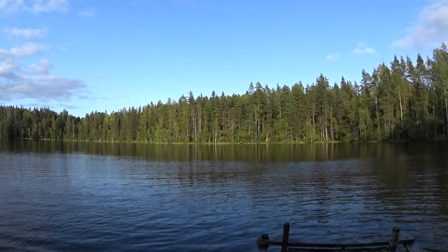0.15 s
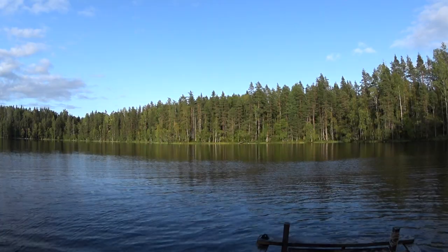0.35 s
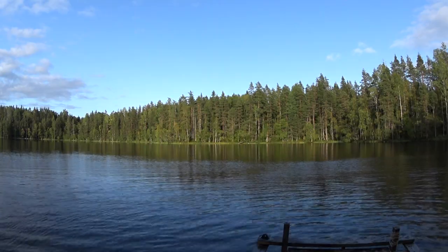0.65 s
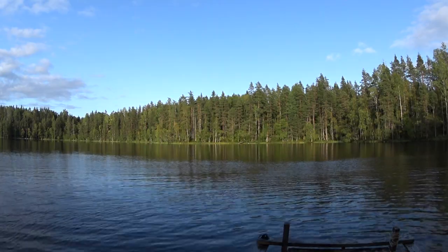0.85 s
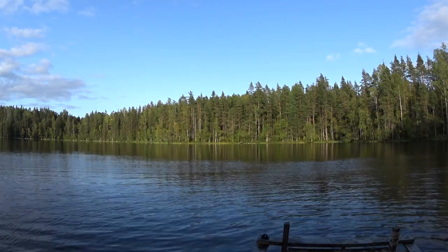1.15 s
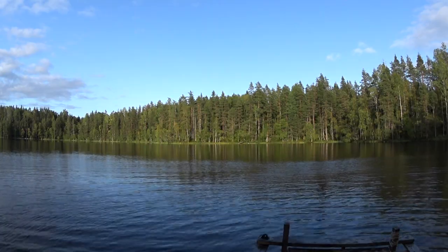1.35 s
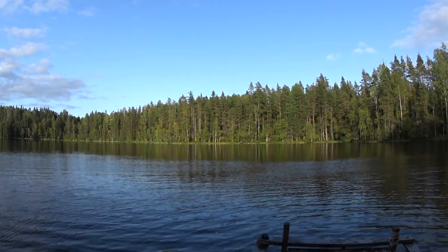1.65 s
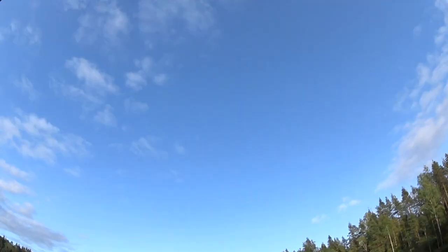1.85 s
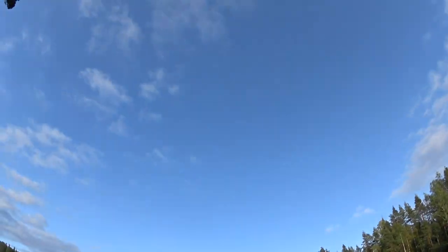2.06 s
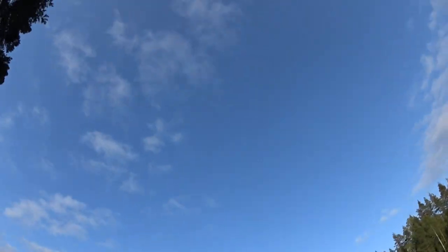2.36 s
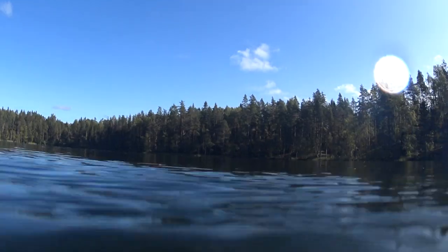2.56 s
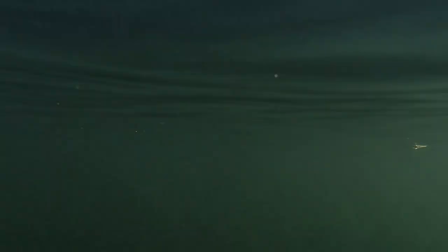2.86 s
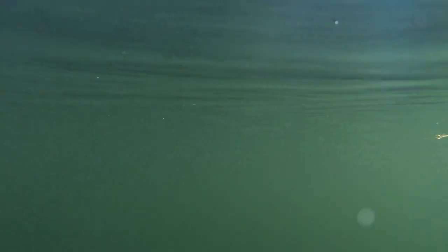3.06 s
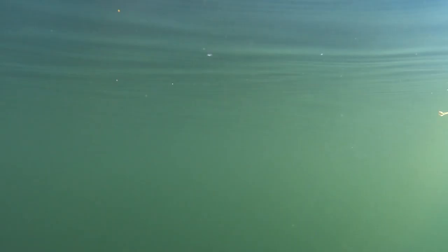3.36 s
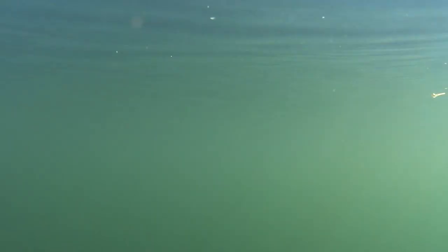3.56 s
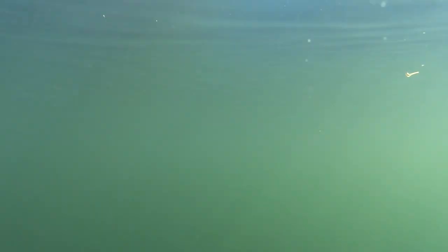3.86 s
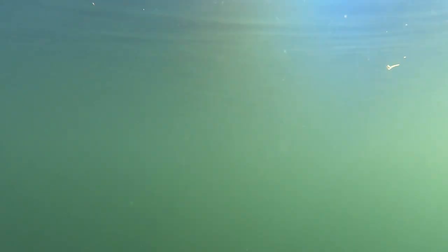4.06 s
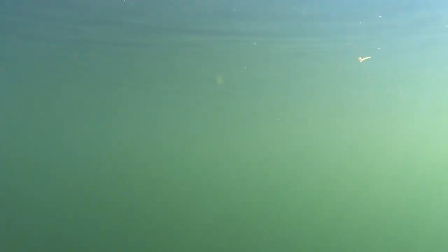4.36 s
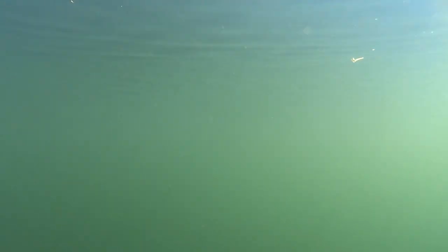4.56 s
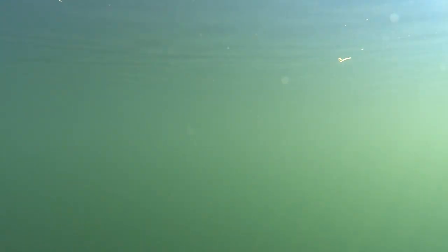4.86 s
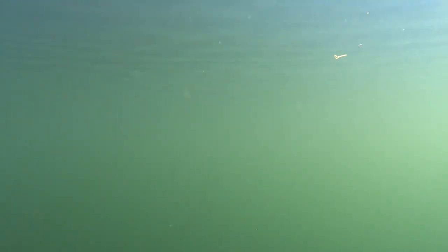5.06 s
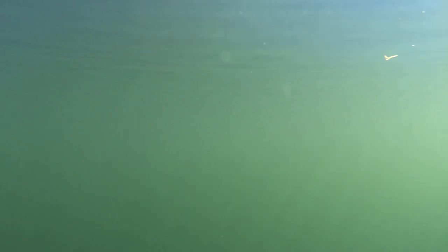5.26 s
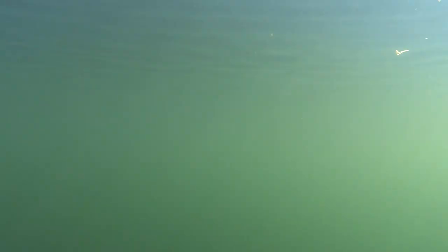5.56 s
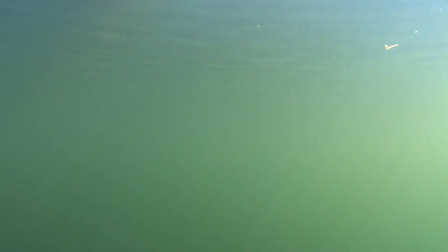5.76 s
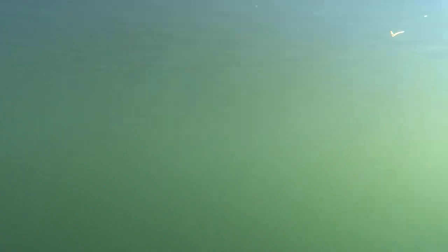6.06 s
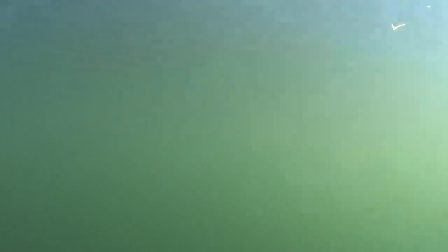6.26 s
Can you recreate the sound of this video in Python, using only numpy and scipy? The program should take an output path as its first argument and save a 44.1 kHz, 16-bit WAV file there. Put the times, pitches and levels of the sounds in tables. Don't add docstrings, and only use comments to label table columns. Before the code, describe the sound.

Uneven low wind and restless water splash around a camera housing outdoors, with a tiny loose fitting rattling. The wash suddenly becomes close and much louder, full of wet slaps and bright spray. Half way through the third second everything drops to a dull submerged hush. Small bubbles pop, trapped air snaps, then a hand strokes and bumps the shell, with one hard knock and a final grip.

```python
import sys
import numpy as np
from scipy import signal
from scipy.fft import rfft, irfft
from scipy.io import wavfile
from scipy.ndimage import uniform_filter1d

SR = 44100
rng = np.random.default_rng(int(sys.argv[2]) if len(sys.argv) > 2 else 0)


def int16_out(signal):
    q = np.round(np.clip(np.atleast_2d(signal).T, -1, 1) * 32767)
    wavfile.write(sys.argv[1], SR, q.astype(np.int16))


def undo_db(level):
    steps = np.asarray(level, float) / 20
    return 10 ** steps


N = 283254
SURFACE = int(2.5 * SR)
SHELL_EDGE_HZ = 1150


def level(x, db):
    return x * undo_db(db) / np.sqrt(np.mean(x ** 2))


def curve(*tables):
    s, *columns = np.vstack(tables).T
    return np.array([np.interp(np.arange(N) / SR, s, c) for c in columns])


def colour(points, hz):
    f, db = np.transpose(points)
    return np.interp(np.log(hz), np.log(f), db)


def band(x, hz, width):
    return signal.lfilter(*signal.iirpeak(min(hz, .44 * SR), hz / width, fs=SR), x)


def steep(x, hz, width):
    return band(band(x, hz, width), hz, width)


def between(x, low_hz, high_hz):
    edges = [low_hz, min(high_hz, .45 * SR)]
    return signal.sosfilt(signal.butter(3, edges, "bandpass", fs=SR, output="sos"), x)


def walk(rate, size=N):
    k = int(SR / rate)
    held = np.repeat(rng.standard_normal(size // k + 1), k)
    return 1.3 * uniform_filter1d(uniform_filter1d(held, k), k)[:size]


def grains(rate, scatter_db, size=N):
    chance, out = rng.random(size), np.zeros(size)
    hit = np.flatnonzero(chance < rate / SR)
    rank = chance[hit] * SR / rate
    out[hit] = (-1.) ** hit * undo_db(scatter_db * np.minimum(-np.log(rank + 1e-9), 4.0))
    return out


def crackle(t, scatter_db):
    size = -np.log(1 - rng.random(len(t) // 44 + 1))
    grain = np.repeat(undo_db(scatter_db * np.minimum(size, 3.5)), 44)[:len(t)]
    return rng.standard_normal(len(t)) * grain


def fade(t60, length=.3):
    t = np.arange(int(length * SR)) / SR
    return t, np.exp(-np.log(1000) * t / np.clip(t60, .004, 1))


def add(out, s, db, x):
    i = int(s * SR)
    x = x[:N - i]
    out[i:i + len(x)] += undo_db(db) * x / np.max(np.abs(x))


def lifts():
    # (time [s], gust level [dB])
    wind = [
        [(.02, -36), (.09, -32), (.32, -48), (.62, -54), (.82, -43), (.9, -53), (1.0, -41), (1.12, -48),
         (1.176, -34), (1.24, -48), (1.33, -30), (1.42, -38), (1.6, -43), (1.71, -56), (1.805, -49)],
        [(1.815, -40), (1.835, -27), (1.94, -42), (2.1, -38), (2.232, -30), (2.27, -33), (2.35, -25),
         (2.41, -35), (2.48, -35)],
    ]
    # (time [s], flow [dB], froth relative to flow [dB])
    lapping = [(.02, -38, -15), (.07, -45, -8), (.318, -58, -3), (.606, -49, -10), (.63, -38, -8),
               (.8, -44, -9), (.85, -33, -9), (.975, -35, -11), (1.14, -32, -4), (1.236, -35, -3),
               (1.29, -49, -2), (1.355, -38, 5), (1.43, -45, -7), (1.59, -45, -7), (1.61, -33, -4),
               (1.7, -46, -12), (1.77, -43, 5), (1.805, -45, -12)]
    # (time [s], flow [dB], froth relative to flow [dB])
    wash = [
        (1.815, -27, 3),
        (1.87, -32, 2),
        (1.933, -28, 4),
        (1.98, -32, -2),
        (2.09, -22, 1),
        (2.232, -22, -9),
        (2.28, -28, -6),
        (2.34, -21, 0),
        (2.48, -25, 2),
    ]
    gust, (flow, froth) = curve(*wind)[0], curve(lapping, wash)
    middling_flow_db, shore_db = -38, -61
    mist = -63 + 1.25 * (flow - middling_flow_db)
    return np.array([gust, flow, flow + froth, np.maximum(mist, shore_db)])[:, :SURFACE]


def rush():
    edges_hz = [30, 150, 800, 2500, 11000]
    # (frequency [Hz], density [dB per Hz])
    rush_colour = [(15, -43), (25, -10.5), (87, -7.5), (149, -2), (327, 2), (391, -0.5), (433, 1.5),
                   (1110, -9), (1550, -16.5), (4400, -31.5), (11000, -57), (14300, -82), (22000, -120)]
    centres = 28 * 2 ** np.arange(0, 8.7, 1 / 3)
    db = colour(rush_colour, centres) + 10 * np.log10(centres)
    group = np.clip(np.searchsorted(edges_hz, centres) - 1, 0, 3)
    totals = np.array([10 * np.log10(np.sum(undo_db(2 * db[group == g]))) for g in range(4)])
    lift = lifts() - totals[:, None]
    mids = np.log(np.sqrt(np.multiply(edges_hz[1:], edges_hz[:-1])))
    surge, gust = walk(60, size=SURFACE), walk(14, size=SURFACE)
    droplets = level(grains(1500, 3.3, size=SURFACE), 0)
    out = 0
    for hz, d in zip(centres, db):
        place = np.interp(np.log(hz), mids, np.arange(4))
        k = min(int(place), 2)
        here = lift[k] + (place - k) * (lift[k + 1] - lift[k])
        eddies = level(grains(1.5 * hz, 4.6, size=SURFACE), 0)
        eddies = eddies + 1.0 * droplets + 0.22 * rng.standard_normal(SURFACE)
        tone = level(steep(eddies, hz, .35 * hz), 0)
        flicker = 1.7 * surge * (hz > 150) + 0.28 * gust + 2.1 * walk(55, size=SURFACE)
        out = out + tone * undo_db(d + here + flicker)
    return np.pad(out, (0, N - SURFACE))


def slaps():
    # (time [s], peak [dB], centre [Hz], t60 [s])
    jetty_slaps = [(0.037, -40, 245, 0.08), (0.082, -39, 190, 0.08), (0.144, -35, 122, 0.052),
                   (0.173, -34.5, 170, 0.046), (0.289, -42.5, 261, 0.073), (0.39, -42, 520, 0.093),
                   (0.434, -37, 383, 0.062), (0.491, -39, 600, 0.08), (0.542, -36, 520, 0.11),
                   (0.631, -25.5, 317, 0.054), (0.722, -33, 750, 0.08), (0.769, -30.5, 487, 0.053),
                   (0.845, -28, 550, 0.08), (.895, -28, 500, .06), (0.925, -26, 450, 0.06),
                   (.94, -25, 450, .03), (1.02, -27, 700, .07), (1.11, -26, 500, .08),
                   (1.17, -28, 450, .08), (1.76, -29, 1300, .04), (0.992, -28, 579, 0.054),
                   (1.052, -24, 600, 0.1), (1.084, -24, 681, 0.037), (1.214, -21.5, 493, 0.17),
                   (1.344, -28, 1300, 0.09), (1.394, -26.5, 150, 0.03), (1.454, -30, 550, 0.08),
                   (1.526, -30, 215, 0.11), (1.602, -30, 600, 0.11), (1.645, -30.5, 326, 0.12),
                   (1.753, -27, 588, 0.08)]
    # (time [s], peak [dB], centre [Hz], t60 [s])
    close_slaps = [(1.813, -18, 662, 0.025), (1.819, -16, 220, .05), (1.834, -18, 200, 0.12),
                   (1.84, -18, 2000, .07), (1.859, -18, 600, .03), (1.89, -23, 600, .06),
                   (1.934, -18, 1900, .07), (2.158, -12, 600, .04), (2.35, -13, 700, .06),
                   (2.284, -17, 400, .06), (1.929, -18, 187, 0.098), (1.985, -16.5, 541, 0.056),
                   (2.067, -11, 600, 0.074), (2.123, -11, 420, 0.099), (2.144, -8, 500, 0.097),
                   (2.197, -16, 740, 0.051), (2.306, -15, 1300, 0.03), (2.329, -7.5, 371, 0.027),
                   (2.389, -14.5, 520, 0.08), (2.429, -14.5, 700, 0.068), (2.474, -17, 450, 0.05),
                   (2.44, -18, 900, .08)]
    out = np.zeros(N)
    for s, db, hz, t60 in [*jetty_slaps, *close_slaps]:
        t, decay = fade(t60)
        push = crackle(t, scatter_db=3.0) * decay * np.minimum(t / .002, 1)
        add(out, s, db - 0.5, steep(push, hz, 1.185 * hz) + 0.19 * between(push, 1.6 * hz, 4.1 * hz))
    return out


def thumps():
    # (time [s], peak [dB], frequency [Hz])
    port_thumps = [(.002, -14, 140), (0.087, -26.5, 157), (.176, -30, 166), (1.311, -34, 109),
                   (1.327, -19, 201), (1.394, -27, 174), (1.532, -30, 204), (1.8255, -19, 190),
                   (1.8295, -16, 180), (1.838, -14, 170), (1.8495, -12, 180), (1.8595, -14, 200),
                   (1.8795, -15, 700), (.148, -30, 250)]
    out = np.zeros(N)
    for s, db, hz in port_thumps:
        t = np.arange(int(3 * SR / hz)) / SR
        swing = np.sin(2 * np.pi * hz * t)
        add(out, s, db, swing * (hz * t) ** 0.78 * np.exp(-2.2 * hz * t))
    return out


def spray():
    # (time [s], peak [dB], bright part relative [dB])
    jetty_spray = [(0.1253, -42, -11), (0.1959, -41.5, -28), (0.5931, -46, -20), (0.6114, -37, 8),
                   (0.6252, -40, 5), (0.6544, -43, -19), (0.8091, -38, -32), (0.8759, -43, -12),
                   (0.8962, -34, -10), (0.9937, -31, -25), (1.0798, -37, -16), (1.1264, -39, -28),
                   (1.152, -39, -28), (1.212, -36, -35), (1.2544, -36.5, -10), (1.3414, -44, -27),
                   (1.3967, -25.5, 14), (1.4355, -40, 10), (1.492, -42, 16), (1.5216, -37.5, -15),
                   (1.5696, -37, -25), (1.6447, -29, -5), (1.7467, -38, -21.5)]
    # (time [s], peak [dB], bright part relative [dB], bright centre [Hz], t60 [s])
    hisses = [
        (.121, -44, 20, 6000, .09),
        (.613, -40, 18, 5800, .08),
        (.725, -40, -10, 4000, .05),
        (.828, -39, 3, 4000, .05),
        (.998, -41, 14, 5800, .08),
        (1.052, -24, 19, 6800, .028),
        (1.4, -30, 22, 6200, .07),
        (1.652, -40, 18, 7000, .12),
    ]
    # (time [s], peak [dB], bright part relative [dB],
    # bright centre [Hz], t60 [s])
    close_spray = [(1.8135, -12, 12, 8000, .016), (1.82, -28, 5, 7000, .05), (1.83, -30, 22, 9000, .05),
                   (1.834, -20, 18, 6500, .09), (1.842, -17, 18, 6500, .08), (1.848, -20, 22, 8500, .06),
                   (1.8555, -14, 18, 8000, .03), (1.864, -24, 16, 7500, .04), (1.876, -35, 16, 8500, .06),
                   (1.8861, -27, 14, 8000, .03), (1.9006, -38, 16, 8000, .02), (1.927, -27, -8, 4500, .05),
                   (1.9345, -22, 8, 3300, .06), (1.9884, -27, 10, 5500, .025), (2.0258, -27, 8, 7500, .015),
                   (2.033, -30, 8, 5000, .03), (2.043, -33, 10, 8000, .015), (2.0518, -20, 22, 7000, .012),
                   (2.0672, -26, 5, 5500, .04), (2.1221, -30, 10, 7500, .12), (2.155, -28, 10, 6000, .04),
                   (2.162, -29, 20, 5600, .014), (2.169, -26, 25, 8500, .01), (2.1995, -16, 9, 8500, .024),
                   (2.2034, -24, 22, 8500, .025), (2.215, -32, 15, 8500, .05), (2.27, -37, 20, 7000, .03),
                   (2.2962, -26, 22, 6300, .018), (2.3065, -30, 8, 5500, .012), (2.3261, -22, 8, 4500, .1),
                   (2.37, -26, 5, 4000, .1), (2.4, -26, 8, 4800, .05), (2.337, -22, 14, 6500, .025),
                   (2.3494, -21, 10, 6500, .012), (2.357, -29, 12, 6500, .03),
                   (2.3944, -26, 20, 7500, .016), (2.4144, -30, 20, 7000, .025),
                   (2.4778, -29, 22, 6000, .02)]
    bright_span = 1.26
    short = [(s, db, bright_db, 8200, .028) for s, db, bright_db in jetty_spray]
    out = np.zeros(N)
    for s, db, bright_db, hz, t60 in [*short, *hisses, *close_spray]:
        t, decay = fade(t60)
        push = crackle(t, scatter_db=3.5) * decay * np.minimum(t / (0.1 * t60), 1)
        body = band(between(push, 500, 5200), 2200, 3900)
        bright = between(push, hz / bright_span ** 2, hz * bright_span)
        add(out, s, db, body + undo_db(bright_db - 15.5) * bright)
    return out


def ringing_noise(hits, modes, t60):
    out = np.zeros(N)
    for s, db, low_db in hits:
        t, chatter = fade(t60)
        rings = []
        for hz, width, g in modes:
            ring = steep(chatter * rng.standard_normal(len(t)), hz, width)
            rings.append(undo_db(g) * ring * np.sqrt(300 / width))
        add(out, s, db, undo_db(low_db) * rings[0] + sum(rings[1:]))
    return out


def clinks():
    # (time [s], peak [dB], lowest mode [dB])
    taps = [
        (.122, -48, 2),
        (.15, -55, 6),
        (.615, -39, 1),
        (.645, -51, 5),
    ]
    # (frequency [Hz], width [Hz], level [dB])
    tap_modes = [
        (3176, 120, 1),
        (8750, 170, -2),
        (9250, 500, -11),
    ]
    return ringing_noise(taps, tap_modes, 0.088)


def top_bursts():
    # (time [s], peak [dB], lowest mode [dB])
    bursts = [
        (1.3978, -29.5, 0.1),
        (1.4376, -45, 0.1),
        (1.4935, -42.5, 0.1),
        (1.5247, -51, 0.1),
    ]
    # (frequency [Hz], width [Hz], level [dB])
    burst_modes = [
        (9600, 300, 0),
        (10200, 900, -2),
        (10900, 600, -4.5),
    ]
    thin_noise = ringing_noise(bursts, burst_modes, 0.11)
    edge_hz = 9380
    return between(between(thin_noise, edge_hz, 16000), edge_hz, 16000)


def knocks():
    # (frequency [Hz], level [dB], t60 [s])
    housing = [
        (408, 2.5, 0.052),
        (688, 4, 0.032),
        (835, -4, 0.035),
        (990, 4, 0.023),
    ]
    # (frequency [Hz], level [dB], t60 [s])
    latch_modes = [
        (1500, -27, .02),
        (1740, -18, 0.02),
        (1860, -21, .02),
    ]
    # (time [s], peak [dB], wall mode [Hz], middle modes [dB], upper modes [dB])
    free_knocks = [
        (4.001, -52, 300, -2, 8.5),
        (4.254, -48.5, 280, 1, 7.5),
        (4.549, -40, 258, 6.5, 7.5),
        (4.893, -44, 270, 6, 18),
        (5.5972, -21, 210, -0.5, 1),
        (5.668, -44, 250, 15, 19),
        (5.84, -44.5, 296, 10, 19),
        (6.197, -44, 301, 20, 10),
        (6.347, -48, 300, 3, 0),
        (6.395, -42.5, 300, 14, 8),
    ]
    # (time [s], peak [dB], wall mode [Hz], middle modes [dB], upper modes [dB])
    held_knocks = [
        (6.3136, -20, 254, 3.5, -12),
        (6.319, -18, 280, 8, -8),
        (6.3265, -26, 278, -7, -24),
        (6.3335, -30, 302, -9, -22),
    ]
    # (time [s], peak [dB], wall mode [Hz], middle modes [dB], upper modes [dB])
    squeezed_knocks = [
        (4.8148, -24, 270, -11, 0),
        (4.8335, -33, 250, -18, -26),
    ]
    grips = [(free_knocks, 1, 1), (held_knocks, .42, 1), (squeezed_knocks, .8, 1.1)]
    blows = [(*blow, rings, stiff) for blows_held, rings, stiff in grips for blow in blows_held]
    out = np.zeros(N)
    for s, db, wall_hz, middle_db, upper_db, rings, stiff in blows:
        t, scuff = fade(.04)
        ring_db = 20 * np.log10(rings)
        shares = [ring_db - 1.5, ring_db, middle_db, upper_db, upper_db]
        modes = [(wall_hz, 0, .055), (stiff * housing[0][0], *housing[0][1:]), *housing[1:]]
        ring = 0
        for (hz, g, t60), share in zip(modes, shares):
            tone = np.sin(2 * np.pi * hz * t) * fade(rings * t60)[1]
            ring = ring + undo_db(g + share) * tone * (1 - np.exp(-t * hz / 1.34))
        ring = ring + .45 * steep(scuff * rng.standard_normal(len(t)), 620, 670)
        latch = sum(undo_db(g) * np.sin(2 * np.pi * hz * t) * fade(t60)[1] for hz, g, t60 in latch_modes)
        latch = latch * undo_db((middle_db + upper_db) / 2) * np.minimum(t / .002, 1) ** 2
        shake = np.sin(2 * np.pi * 80 * t) * t * 75 * fade(0.1)[1]
        thump = 0.009 * undo_db(2 * min(middle_db, 4.0) + db + 20) * shake
        shell = between(between(ring + thump, 30, SHELL_EDGE_HZ), 30, 1.3 * SHELL_EDGE_HZ)
        add(out, s, db, latch - shell)
    return out


def bubbles():
    # (time [s], peak [dB], frequency [Hz], t60 [s], click share [dB])
    pops = [(2.501, -42, 850, 0.012, 14), (2.522, -47, 1830, .015, 4), (2.533, -31.5, 2000, 0.009, -3),
            (2.537, -38, 2050, .02, -30), (2.533, -34.5, 907, 0.013, -20), (2.582, -37, 1330, 0.022, -23),
            (2.737, -50, 1484, 0.01, 22), (2.908, -50.5, 1150, .015, 2.5), (3.105, -48, 1100, 0.01, 18),
            (3.139, -51.5, 420, 0.027, 9), (3.252, -54, 1700, 0.021, 9), (3.484, -42, 1794, 0.021, -15),
            (6.317, -50, 2500, 0.012, 0), (6.317, -56, 4300, .008, 6), (6.317, -54, 3400, .008, 6),
            (6.403, -66, 2350, .12, -20), (3.105, -58, 3100, .012, 0), (2.737, -58, 1950, .01, 5),
            (2.533, -40, 1400, .01, -20)]
    # (time [s], peak [dB], frequency [Hz], t60 [s], click share [dB])
    snap = [ (3.267, -30.5, 1096, 0.035, -14), (3.267, -19.5, 1636, 0.029, -25),
            (3.267, -33.5, 773, 0.057, -25), (3.274, -44, 5900, .008, 0), (3.278, -25.5, 2830, 0.022, -12),
            (3.278, -30, 4190, 0.012, -20), (3.278, -32, 2400, .02, -20), (3.278, -36, 1500, .02, -20),
            (3.278, -36, 750, .03, -20), (3.285, -62, 3270, .15, -30), (3.278, -30, 1074, 0.037, -3),
            (3.285, -62, 3090, 0.26, -30), (3.29, -56.5, 482, 0.63, -30), (3.29, -64, 647, .3, -30),
            (3.282, -47, 2700, 0.078, -30)]
    # (time [s], peak [dB], frequency [Hz], t60 [s], click share [dB])
    plinks = [(.198, -33, 1100, 0.008, 2), (.809, -37.5, 3850, .015, -5), (1.816, -11, 2420, 0.0082, 0),
              (1.8165, -11, 800, .011, -10), (1.857, -15, 7500, .008, -5), (1.921, -32, 8000, .009, -20),
              (1.921, -28, 3900, .01, -10), (2.068, -26, 4900, .01, -5), (2.175, -30, 4500, .03, -20),
              (2.203, -18, 2500, .015, -6), (2.231, -33, 7500, .01, -20), (.622, -38, 3150, .03, -10),
              (.65, -42, 3150, .03, -20), (.897, -39, 2500, .012, 0), (1.385, -38, 3300, .015, -10),
              (2.199, -15.5, 2590, .025, -6), (2.204, -19, 6390, .012, -15), (2.211, -26, 6300, .012, -15),
              (2.307, -11, 2200, 0.014, -15), (2.308, -16, 1600, .018, -22), (2.316, -25, 3400, .01, -20),
              (2.32, -22, 2100, .015, -20), (2.478, -27, 5300, 0.013, -15)]
    out = np.zeros(N)
    for s, db, hz, t60, click_db in [*pops, *snap, *plinks]:
        t, decay = fade(t60)
        rise = 1 + 0.011 * t / max(t60, .03)
        tone = np.sin(2 * np.pi * hz * t * rise) * decay * np.minimum(t / 0.00071, 1)
        wobble = 0.97 * band(rng.standard_normal(len(t)) * decay ** .6, hz, 0.16 * hz)
        click = steep(rng.standard_normal(len(t)) * fade(0.0088)[1], min(2.1 * hz, 5000), 3600)
        add(out, s, db, tone + wobble + undo_db(click_db - 7.0) * click)
    return out


def pressure(hz):
    # (time [s], length [s], level [dB], favoured pitch [Hz])
    strokes = [(2.79, .12, -68, 950), (2.98, .05, -64, 620), (3.3, .05, -59, 880), (3.29, .1, -73, 240),
               (3.35, .07, -66, 750), (4.45, .1, -65, 1000), (4.59, .1, -60, 650), (4.7, .06, -65, 520),
               (4.78, .1, -59, 700), (4.9, .06, -63, 750), (5.0, .03, -63, 750), (5.09, .06, -62, 800),
               (5.22, .16, -64, 700), (5.46, .07, -66, 900), (5.62, .1, -62, 520), (5.78, .1, -57, 880),
               (5.8, .08, -71, 230), (6.01, .1, -56, 680), (6.16, .14, -57, 760), (6.33, .04, -52, 480)]
    grip_s, let_go_s, press_db = .04, .07, -2.5
    focus_db = 7.5
    t = np.arange(0, N / SR + .002, .002)

    def share(db, favoured):
        return undo_db(db - focus_db * np.log2(hz / favoured) ** 2)

    drive = share(-80, 900)
    for s, length, db, favoured in strokes:
        corners = s + np.cumsum([-grip_s, grip_s, length, let_go_s])
        drive = drive + share(db + press_db, favoured) * np.interp(t, corners, [0, 1, 1, 0]) ** 2
    return np.interp(np.arange(N) / SR, t, drive)


def rubbing():
    # (frequency [Hz], width [Hz])
    rub_modes = [
        (230, 79),
        (400, 170),
        (700, 150),
        (1030, 180),
    ]
    # (frequency [Hz], width [Hz], level [dB])
    loose_panels = [
        (545, 90, -6),
        (850, 100, -2),
    ]
    panel_held_s = 5.7
    slips = level(grains(600, 2.3), 0) + 1.05 * rng.standard_normal(N)
    creak = 2.2 * walk(45)

    def mode(hz, width):
        tone = level(steep(slips, hz, width), 0)
        return tone * undo_db(.6 * creak + 1.6 * walk(40)) * pressure(hz)

    free = np.clip((panel_held_s - np.arange(N) / SR) / .08, 0, 1)
    shell = sum(mode(hz, width) for hz, width in rub_modes)
    panels = sum(undo_db(db) * mode(hz, width) for hz, width, db in loose_panels)
    return between(shell + free * panels, 90, SHELL_EDGE_HZ)


def settling():
    # (frequency [Hz], width [Hz], loudest time [s], level [dB], swell [s], fade [s])
    swirl = (70, 50, 2.83, -79, .03, .35)
    gurgle = (168, 30, 3.015, -67, .06, .1)
    fizz = (2200, 360, 2.985, -69, .1, .05)
    t, out = np.arange(N) / SR, 0
    for hz, width, s, db, swell, fall in (swirl, gurgle, fizz):
        water = level(steep(rng.standard_normal(N), hz, width), db)
        out = out + water * np.exp(-np.abs(t - s) / np.where(t < s, swell, fall))
    return out


def hush():
    # (frequency [Hz], density [dB per Hz])
    hush_colour = [(18, -51.5), (30, -30), (206, -10.5), (466, -2), (554, -2.5), (864, 1), (1130, -5.5),
                   (1680, -4.5), (4090, -16), (10200, -20.5), (11000, -20.5), (14300, -52.5), (22000, -120)]
    hz = np.maximum(np.fft.rfftfreq(N, 1 / SR), 1)
    hiss = irfft(rfft(rng.standard_normal(N)) * undo_db(colour(hush_colour, hz)), N)
    return level(hiss, -66)


def scene():
    change_s = 2.49
    above = np.clip((change_s - np.arange(N) / SR) / 0.0018, 0, 1)
    water = rush() + slaps() + thumps() + spray()
    high_sounds = clinks() + top_bursts()
    below = knocks() + bubbles() + (rubbing() + settling()) * (1 - above)
    return ((water + high_sounds) * above + below + hush())[None]


def low_pass(x):
    return signal.sosfilt(signal.butter(12, 12410, fs=SR, output="sos"), x)


def record(dry):
    top = signal.ellip(8, .3, 54, 10940, fs=SR, output="sos")
    wet = signal.sosfilt(top, np.tanh(1.295 * dry) / 1.31)
    return low_pass(wet - .2 * wet ** 3)


dry = scene()
out = record(dry)
int16_out(out)
```